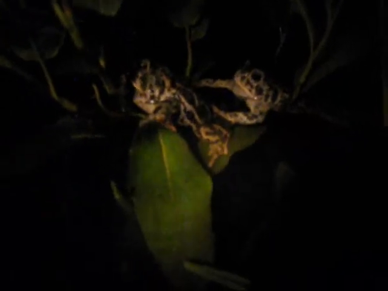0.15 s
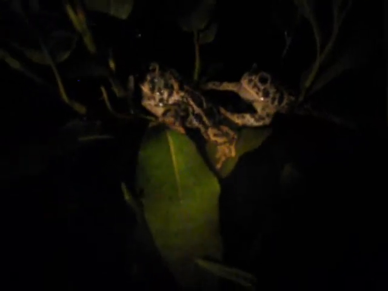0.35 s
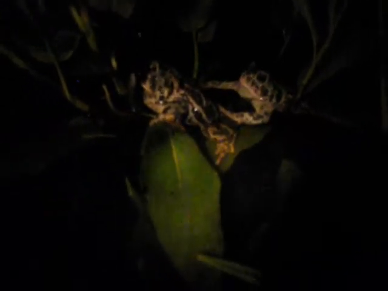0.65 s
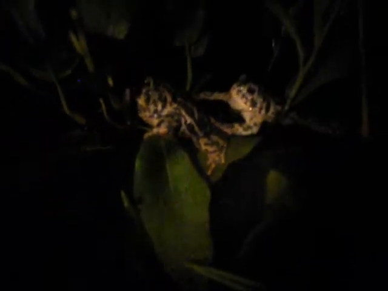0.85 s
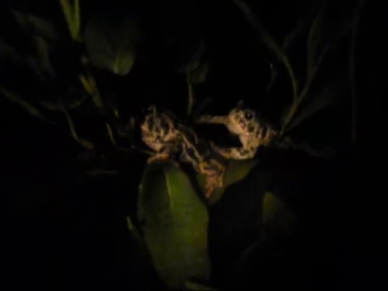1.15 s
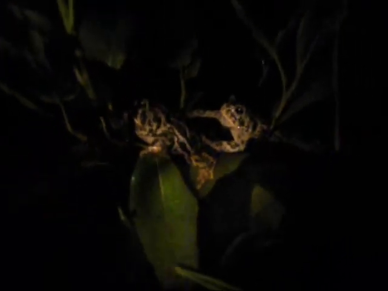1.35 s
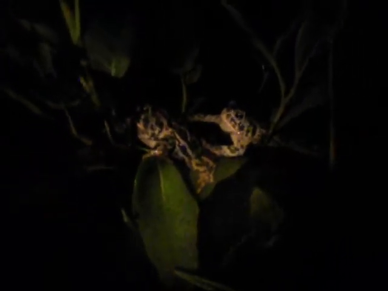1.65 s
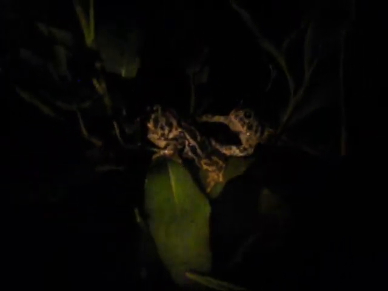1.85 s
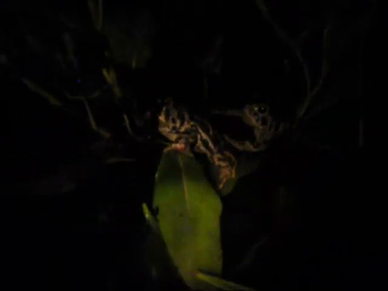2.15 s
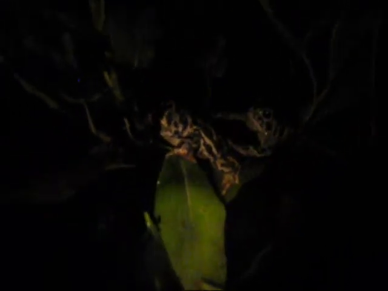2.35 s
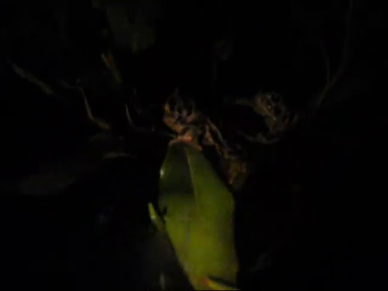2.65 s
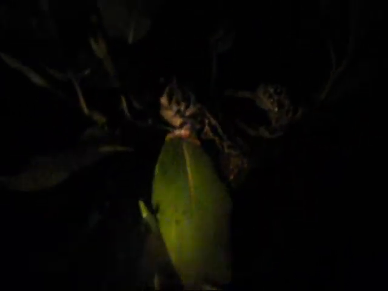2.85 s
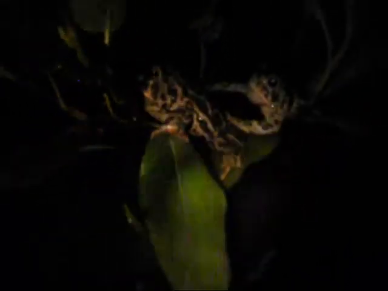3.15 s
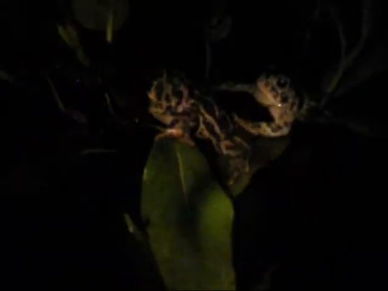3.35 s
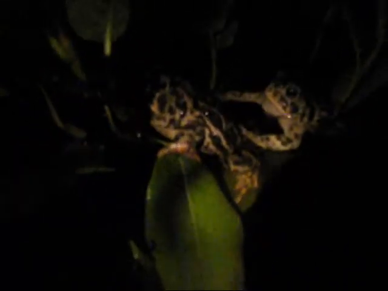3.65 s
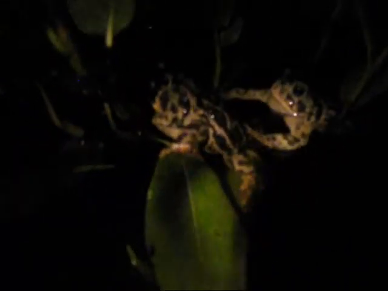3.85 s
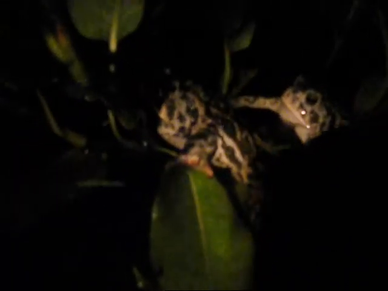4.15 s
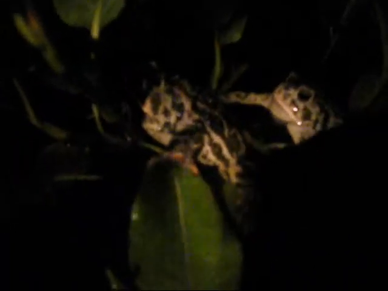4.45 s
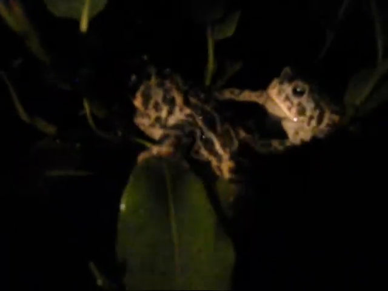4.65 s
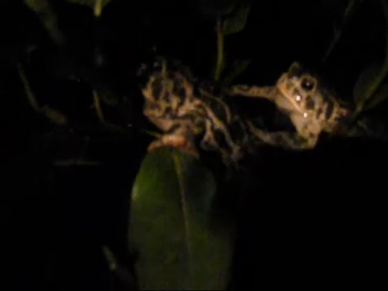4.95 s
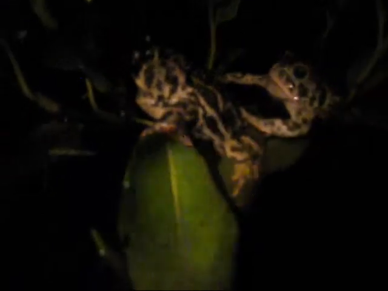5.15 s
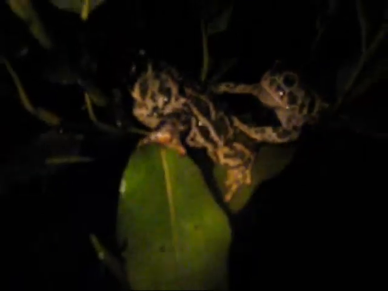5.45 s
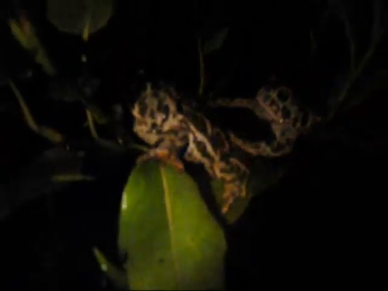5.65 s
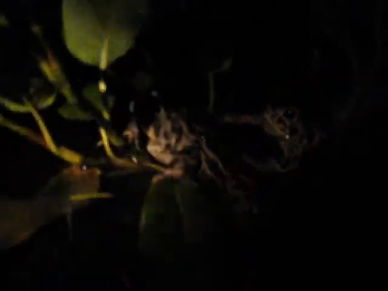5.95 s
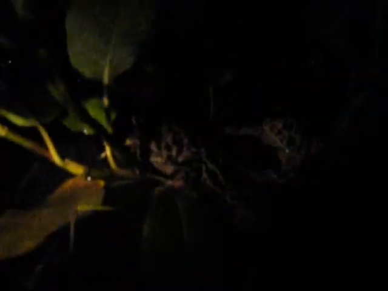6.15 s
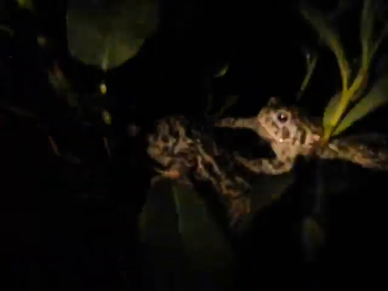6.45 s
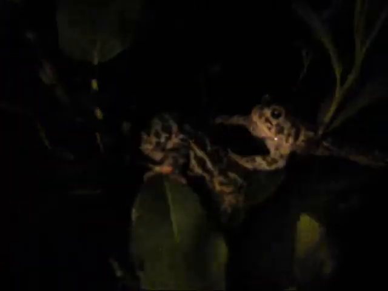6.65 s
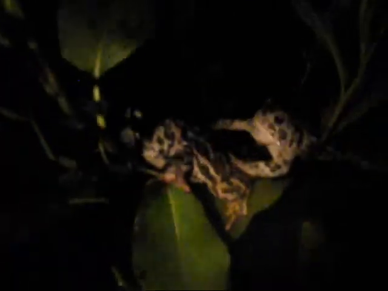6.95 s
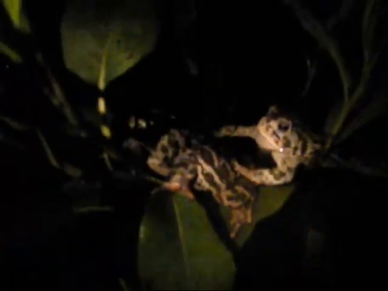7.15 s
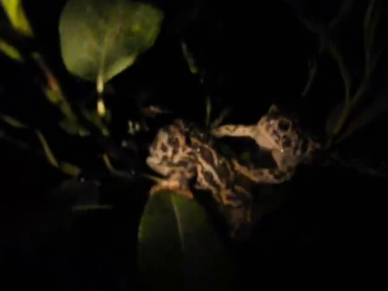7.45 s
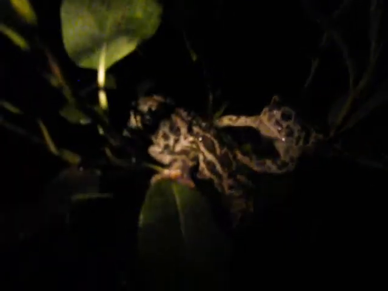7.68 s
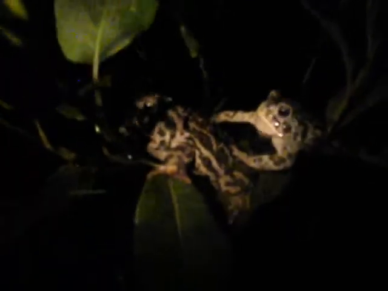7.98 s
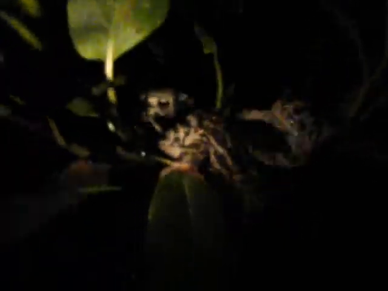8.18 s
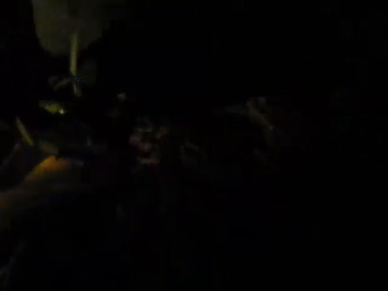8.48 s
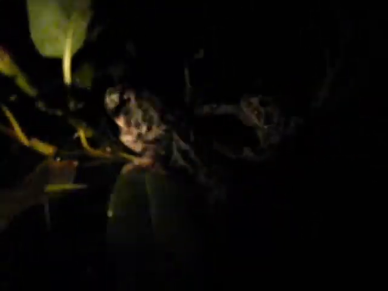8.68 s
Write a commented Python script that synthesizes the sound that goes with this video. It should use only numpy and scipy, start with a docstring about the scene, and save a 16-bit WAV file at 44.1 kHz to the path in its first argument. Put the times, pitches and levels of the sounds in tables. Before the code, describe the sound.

A loud toad chorus is already going at 0 s and never stops: three close males repeat short pulsed notes around 16 to 18 times a second, near 2.3 to 2.5 kHz, blending into a shrill, fluttering buzz over many distant callers. Faint drips plink at 0.3 to 0.5 s and 1.35 s. At about 1.5 s a fourth male enters with a quick rising run, a little slower and lower, and stays prominent. Small frogs tick in short accelerating-free, loosening combs throughout. Rough snores rise faintly at 1.1, 2.6, 5.3, 7.5 and 8.3 s; low grunts come near 1.6, 2.1, 5.2 and 5.8 s. Deep nasal calls murmur behind, the higher one clearer after 6.4 s. Wind thumps the microphone at 0.9 to 1.9 s, hardest near 2.6 s, again at 3.8 s, and lightly after 6.9 s. Sound is gritty, hissy and metallic, ending mid-chorus at 8.8 s.

```python
"""Toads trilling by a flooded field at night

Four near males each repeat a short note of a few throat pulses, tone bursts weighted by the vocal sac, over a far
chorus. Pulsed resonances make a snoring toad, two deep toads and low grunts; small frogs tick and drips fall.
Light wind, as low filtered noise and hard buffets, strikes the microphone. A small camera keeps 8-bit samples
at a low rate and holds each one, which mirrors the trill in the treble."""
import sys
import numpy as np
from scipy import signal
from scipy.io import wavfile
from scipy.ndimage import map_coordinates

SR = 44100
rng = np.random.default_rng(int(sys.argv[2]) if len(sys.argv) > 2 else 0)


def digitize_waveform(pressure):
    """Quantize a signal to 16-bit integers and store it at the path in sys.argv[1].

    Rows of a 2-D input are taken as channels; values are limited to [-1, 1].
    """
    field = np.atleast_2d(pressure).T
    bounded = np.clip(field, -1, 1)
    quanta = np.round(bounded * 32767).astype(np.int16)
    wavfile.write(sys.argv[1], SR, quanta)


N = 388962  # samples


def undb(db):
    """Decibel law: 20 dB is a factor of ten in amplitude."""
    return 10 ** (np.asarray(db) / 20)


def level(x, db):
    """Root-mean-square level: scale a signal to db."""
    return x * undb(db) / np.sqrt(np.mean(x ** 2))


def curve(table, column):
    """Linear interpolation: one column of a table at every sample."""
    rows = np.array(table)
    return np.interp(np.arange(N) / SR, rows[:, 0], rows[:, column])


def band(x, lo_hz, hi_hz):
    """Resonant selection: keep the band between two frequencies."""
    return signal.sosfilt(signal.butter(2, [lo_hz, hi_hz], "bandpass", fs=SR, output="sos"), x)


def bursts(s, hz, db, ms, turns=None):
    """Damped oscillation: tones whose rounded envelopes peak at s, with decay constant ms and turns as phase there."""
    s, hz, db = np.broadcast_arrays(s, hz, db)
    tau = ms * SR / 1000
    k = np.arange(int(16 * tau))
    # the envelope reaches 1 after four decay constants
    shape = (k / (4 * tau)) ** 4 * np.exp(4 - k / tau)
    at = (s * SR - 4 * tau).astype(int)[:, None] + k
    turns = rng.random(len(s)) if turns is None else turns
    turn = turns[:, None] + hz[:, None] * (at / SR - s[:, None])
    wave = undb(db)[:, None] * shape * np.sin(2 * np.pi * turn)
    inside = (at >= 0) & (at < N)
    return np.bincount(at[inside], wave[inside], N)


def run_of_pulses(start, end, rate, first_hz, last_hz, db, ms):
    """Pulse train with a glide: even bursts whose pitch climbs through the call."""
    s = np.arange(start, end, 1 / rate)
    return bursts(s, np.interp(s, [start, end], [first_hz, last_hz]), db, ms)


PULSE_SCATTER_DB, PULSE_JITTER_MS = 2, 0.25
PITCH_SCATTER = 0.012  # fraction of the pitch, drawn once a note


def trill(starts, db, note, pitch, ms):
    """Phase continuity: one tone runs on through the pulses of each note, drawn out when the beat is slow."""
    lag_ms, hz, rel_db = np.transpose(note)
    period = np.gradient(starts)
    chance = rng.standard_normal((len(starts), len(note), 3))
    stretched_ms = np.outer(period / np.median(period), lag_ms)
    s = starts[:, None] + (stretched_ms + PULSE_JITTER_MS * chance[..., 0]) / 1000
    f = pitch * hz * (1 + PITCH_SCATTER * chance[:, :1, 1])
    # phase advances at the mean pitch of neighbouring pulses
    mean_hz = (f + np.roll(f, 1, axis=1)) / 2
    turns = chance[:, :1, 0] + np.cumsum(np.diff(s, prepend=s[:, :1]) * mean_hz, axis=1)
    size_db = db[:, None] + rel_db + PULSE_SCATTER_DB * chance[..., 2]
    return bursts(s.ravel(), f.ravel(), size_db.ravel(), ms, turns.ravel())


# Loudness of each near male. Each row: time in seconds, note level in dB before pulse and sac weighting.
HIGH_LEVEL = [(0, -13), (0.7, -11.5), (1.3, -10), (2.7, -15), (4.7, -12.5), (6.0, -16.5), (7.4, -14.5),
              (8.0, -17.5), (8.8, -14)]
JOINING_LEVEL = [(1.5, -14.5), (2.3, -10.5), (3.001, -10.5), (4.2, -10.5), (6.2, -10.5), (6.801, -9.5),
                 (7.6, -11.5), (8.8, -9)]
QUICK_LEVEL = [(0, -14), (0.7, -20.5), (1.3, -11), (2.001, -16), (2.7, -11.5), (3.4, -14.5), (5.601, -26),
               (7.0, -28), (8.8, -25.5)]
SLOW_LEVEL = [(0, -10.5), (0.7, -16.5), (1.5, -12.5), (2.2, -17), (4.4, -21), (5.1, -13), (5.8, -18.5),
              (7.3, -17.5), (8.8, -16)]
# One note, pulse by pulse; the pitch sags as the sac empties.
# Each row: lag from the note centre in ms at the median beat, pitch in Hz before the singer's pitch factor,
# relative level in dB.
HIGH_NOTE = [(-15.5, 2700, -13.5), (-8, 2500, 0.5), (-2.5, 2520, 2), (4, 2450, 1.5), (9.5, 2350, -3.5),
             (13.5, 2280, -9), (20, 2250, -13.5)]
JOINING_NOTE = [(-18, 2200, -15), (-9, 2250, 0.5), (-2.5, 2330, 3), (4.5, 2230, 0), (10.5, 2080, -9),
                (19.5, 1980, -15)]
QUICK_NOTE = [(-15.5, 2350, -10), (-9, 2400, -3), (-3, 2420, 1.5), (1.5, 2430, 0.5), (7.5, 2330, -2),
              (14, 2280, -6)]
SLOW_NOTE = [(-12.5, 2600, -3), (-6, 2380, 3), (2, 2330, 1), (8, 2250, -2.5), (14.5, 2200, -8)]
# Tempo of each near male from his first note on. Each row: time in seconds, notes per second.
HIGH_TEMPO = [(-.018, 17.816), (1.355, 18.188), (2.01, 17.903), (6.751, 17.773), (7.466, 17.996),
              (8.8, 17.83)]
JOINING_TEMPO = [(1.513, 13.57), (2.129, 13.082), (3.231, 15.751), (5.653, 15.55), (5.842, 16.147),
                 (7.725, 15.902), (7.933, 16.385), (8.8, 15.848)]
QUICK_TEMPO = [(-.029, 17.68), (1.749, 17.373), (2.378, 16.605), (3.303, 17.244), (5.089, 16.498),
               (6.977, 17.284), (8.8, 17.025)]
SLOW_TEMPO = [(-.004, 16.547), (1.87, 16.257), (1.943, 16.515), (6.331, 16.392), (8.8, 16.053)]
# The joining male pumps up his sac with one rising run.
# The row: start in seconds, end in seconds, pulses per second, first pitch in Hz, last pitch in Hz,
# level in dB before the sac.
SAC_PUMP = (1.525, 1.59, 139.5, 1780, 2150, -23)
PULSE_MS = 0.45  # decay constant


def near_males():
    """Phase accumulation: each male starts a note whenever his tempo has added up to one more beat."""
    males = (
        (HIGH_TEMPO, HIGH_LEVEL, HIGH_NOTE),
        (JOINING_TEMPO, JOINING_LEVEL, JOINING_NOTE),
        (QUICK_TEMPO, QUICK_LEVEL, QUICK_NOTE),
        (SLOW_TEMPO, SLOW_LEVEL, SLOW_NOTE),
    )
    out = run_of_pulses(*SAC_PUMP, PULSE_MS)
    for tempo, loudness, note in males:
        t = tempo[0][0] + np.arange(N + SR) / SR
        beats = np.cumsum(np.interp(t, *np.transpose(tempo))) / SR
        starts = np.interp(np.arange(int(beats[-1])), beats, t)
        db = np.interp(starts, *np.transpose(loudness))
        out = out + trill(starts, db, note, pitch=0.99, ms=PULSE_MS)
    return out


FAR_DB, FAR_PULSE_MS = -33.5, 0.55  # level before the sac; decay constant
FAR_PITCH_SPREAD = 0.07  # largest fractional shift either way


def far_males(count=10):
    """Incoherent superposition: many males across the field, each with his own beat, size and distance."""
    out = 0
    for beat, size, near, first in rng.random((count, 4)):
        starts = np.arange(-first, 170) / (14.5 + 4.5 * beat)  # notes per second
        pitch = 1 + FAR_PITCH_SPREAD * (2 * size - 1)
        out = out + trill(starts, np.full(len(starts), 6 * near), QUICK_NOTE, pitch, FAR_PULSE_MS)
    return level(out, FAR_DB)


SAC_HZ, SAC_DB = 2150, 3  # corner frequency; gain above it


def sac(x):
    """Radiation efficiency: the vocal sac radiates poorly below its corner, thinning each pulse's low flank."""
    return undb(SAC_DB) * signal.sosfilt(signal.butter(2, SAC_HZ, "highpass", fs=SR, output="sos"), x)


# Small frogs' combs of ticks. Each row: first tick in seconds, last tick in seconds, number of ticks,
# first gap in ms, level in dB toward which the ticks rise, before scatter.
TICK_COMBS = [(0.299, 0.659, 10, 27, -30.5), (0.888, 1.083, 6, 36, -27.5), (1.646, 1.975, 9, 31, -30),
              (2.205, 2.399, 6, 36, -30), (3.22, 3.551, 9, 36, -31), (3.748, 3.897, 5, 35, -34.5),
              (4.458, 4.779, 9, 33, -31.5), (5.05, 5.212, 5, 43, -35.5), (5.762, 6.047, 8, 34, -37.5),
              (6.35, 6.543, 6, 33, -35), (6.957, 7.193, 7, 31, -36.5), (7.482, 7.673, 6, 38, -35.5),
              (7.95, 8.201, 8, 31, -38.5), (8.693, 8.811, 4, 40, -35.5)]
COMB_HZ, COMB_START_DB, COMB_SCATTER_DB = (3250, 3620), -5.5, 2.5
TICK_MS = 0.7  # decay constant
CLOSING_MS, CLOSING_HZ, CLOSING_DB = 32, 3450, -5.5  # one weak tick ends each comb


def small_frogs():
    """Rhythmic modulation: gaps drift, mostly wider, and level off while pitch and mean strength climb."""
    out = 0
    for first, last, ticks, gap_ms, db in TICK_COMBS:
        along = np.linspace(0, 1, round(ticks))
        widen = np.sin(np.linspace(0, 0.6 * np.pi, len(along) - 1)) ** 2
        # share the time left over by even gaps so that the comb ends on its last tick
        spare = last - first - len(widen) * gap_ms / 1000
        gaps = gap_ms / 1000 + widen * spare / widen.sum()
        rise = np.sin(0.47 * np.pi * along)
        size_db = db + COMB_START_DB * (1 - rise) + COMB_SCATTER_DB * rng.standard_normal(len(along))
        s = first + np.r_[0, np.cumsum(gaps)]
        out = out + bursts(s, np.interp(rise, [0, 1], COMB_HZ), size_db, TICK_MS)
        out = out + bursts([last + CLOSING_MS / 1000], CLOSING_HZ, db + CLOSING_DB, TICK_MS)
    return out


# Snoring calls. Each row: start in seconds, end in seconds, pulses per second, first pitch in Hz,
# last pitch in Hz, pulse level in dB.
SNORE_CALLS = [(1.101, 1.574, 58, 1120, 1210, -45.5), (2.599, 3.215, 54, 1224, 1268, -42.5),
               (5.255, 5.75, 56, 1180, 1250, -52), (7.498, 8.082, 51, 1138, 1217, -50.5),
               (8.253, 8.804, 61, 1205, 1307, -45.5)]


def snoring_toad():
    """Pulsed resonance: bursts too quick to count merge into a rough, rising snore."""
    return sum(run_of_pulses(*call, ms=0.9) for call in SNORE_CALLS)


# Two deeper-voiced toads far off. Each row: time in seconds, lower toad's level in dB, upper toad's level in dB.
DEEP_LEVELS = [(0.0, -48.5, -51.5), (0.44, -50, -49), (0.68, -51, -54.5), (1.87, -51.5, -48),
               (3.91, -45, -49.5), (4.54, -47, -48), (4.84, -45, -45), (6.04, -47, -45), (6.41, -46, -41),
               (7.2, -53.5, -41), (8.47, -54.5, -40), (8.82, -53.5, -40.5)]
DEEP_HZ, DEEP_RATES = (1692, 1810), (55, 51.5)  # resonances; pulses per second


def deep_toads():
    """Impulse excitation: each toad strikes his resonance afresh at a nearly even pace, a long nasal call."""
    out = 0
    for toad, (hz, rate) in enumerate(zip(DEEP_HZ, DEEP_RATES)):
        chance = rng.standard_normal((600, 2))
        s = np.cumsum(1 + 0.012 * chance[:, 0]) / rate
        heard = s < N / SR
        pulses = np.bincount((s[heard] * SR).astype(int), undb(2.2 * chance[heard, 1]), N)
        calls = band(band(pulses, hz - 90, hz + 90), hz - 90, hz + 90)
        out = out + level(calls, 0) * undb(curve(DEEP_LEVELS, 1 + toad))
    return out


# Low grunts close by. Each row: start in seconds, end in seconds, pulses per second,
# level of the low resonance in dB before its swell and scatter, upper resonance in Hz,
# upper level relative to the low one in dB.
GRUNT_CALLS = [(1.606, 1.682, 100, -44.5, 700, 2), (2.083, 2.173, 83, -42.5, 705, 4),
               (5.201, 5.269, 85, -50.5, 480, 5.5), (5.798, 5.871, 68, -50.5, 590, 4)]


def grunts():
    """Coupled excitation: a few slow, uneven pulses ring a low resonance and a broader upper one."""
    out = 0
    for start, end, rate, db, upper_hz, upper_db in GRUNT_CALLS:
        s = np.arange(start, end, 1 / rate)
        swell_db = 4 * np.log10(np.hanning(len(s) + 2)[1:-1])
        size_db = db + swell_db + 2.2 * rng.standard_normal(len(s))
        out = out + bursts(s, 200, size_db, ms=1.9)
        out = out + bursts(s, upper_hz, size_db + upper_db, ms=0.44)
    return out


# Drips into the water. Each row: time in seconds, peak level in dB, pitch in Hz.
WATER_DRIPS = [(0.3, -41.5, 258), (0.388, -41.5, 384), (0.474, -38.5, 315), (1.353, -36.5, 847)]


def drips():
    """Damped resonance: each drip into the water is one short low tone."""
    s, db, hz = np.transpose(WATER_DRIPS)
    return bursts(s, hz, db, ms=0.92)


FAR_FROGS_DB, FAR_FROGS_HZ = -50, (2905, 4083)


def far_frogs(count=2500):
    """Random superposition: ticks of many distant small frogs merge into a haze, thinner toward the top."""
    when, high, size = rng.random((count, 3)).T
    lo_hz, hi_hz = FAR_FROGS_HZ
    ticks = bursts(when * N / SR, lo_hz + (hi_hz - lo_hz) * high, 6 * size - 9 * high, ms=0.6)
    return level(ticks, FAR_FROGS_DB)


FIELD_DB, FIELD_T60_S = -13, 0.08  # tail energy against the direct sound; time to fall 60 dB


def field(x):
    """Diffuse scattering: plants and water trail every call with a short decaying tail."""
    t = np.arange(int(0.4 * SR)) / SR
    tail = rng.standard_normal(len(t)) * 10 ** (-3 * t / FIELD_T60_S)
    return x + undb(FIELD_DB) * signal.fftconvolve(x, tail / np.linalg.norm(tail))[:N]


# Strength of the breeze at the microphone. Each row: time in seconds, level in dB.
BREEZE = [(0, -57.5), (0.39, -60.5), (0.83, -60.5), (1.1, -47), (2.0, -49.5), (2.25, -59), (2.48, -55),
          (2.65, -51.5), (3.3, -53), (3.5, -62.5), (3.8, -53), (4.0, -62), (5.8, -63.5), (6.9, -54.5),
          (7.84, -62), (8.25, -50.5), (8.55, -57), (8.82, -55.5)]
# Single hard buffets. Each row: time in seconds, peak level in dB.
BUFFETS = [(0.024, -40.5), (0.885, -34), (1.008, -34), (1.096, -37), (1.248, -27.5), (1.333, -38.5),
           (1.474, -42), (1.554, -36), (1.59, -36), (1.711, -36), (1.905, -31.5), (2.551, -35),
           (2.628, -24), (2.702, -25.5), (2.786, -44.5), (3.012, -47), (3.223, -39.5), (3.735, -33),
           (3.773, -33), (3.835, -32.5), (6.857, -39.5), (7.14, -39.5), (7.486, -35.5), (8.3, -37),
           (8.644, -37.5)]
BUFFET_HZ, BUFFET_MS = 109, 0.94  # pitch; decay constant


def wind():
    """Turbulence: eddies thump the microphone port, dull puffs of uneven size over a rumble, and hard buffets."""
    struck = rng.random(N) < 60 / SR  # about 60 puffs a second
    puffs = struck * rng.standard_normal(N) * undb(3 * rng.exponential(size=N))
    air = level(puffs, 1.5) + rng.standard_normal(N)
    breeze = level(band(air, 22, 105), 0) * undb(curve(BREEZE, 1))
    s, db = np.transpose(BUFFETS)
    return breeze + bursts(s, BUFFET_HZ, db, BUFFET_MS)


def hiss():
    """White noise: equal power at every frequency, a steady hiss."""
    return level(rng.standard_normal(N), -51)


def scene():
    """Linear superposition: calls cross the field, while near sounds, wind and hiss arrive without its tail."""
    trills = sac(near_males() + far_males())
    calls = trills + small_frogs() + snoring_toad() + deep_toads() + far_frogs()
    close = grunts() + drips() + wind()
    return (field(calls) + close + hiss())[None]


OVERLOAD = 0.32  # level at which the preamplifier runs out of swing
CAMERA_RATE, STEPS = 11024, 128  # samples per second; steps per unit of amplitude
SLIP = 419  # offset of the sampling grid, in output samples
TOP_HZ = 15700  # upper band limit


def record(dry):
    """Saturation and aliasing images: flatten peaks, band-limit, round down to 8 bits and hold each sample."""
    squeezed = dry[0] / (1 + (dry[0] / OVERLOAD) ** 4) ** 0.25
    smooth = signal.sosfilt(signal.butter(8, 5300, fs=SR, output="sos"), squeezed)
    # the rates do not divide evenly, so a few holds a second last one step longer
    slot = (np.arange(N) + SLIP) * CAMERA_RATE // SR
    held = map_coordinates(smooth, [slot * SR / CAMERA_RATE - SLIP], order=3, mode="nearest")
    stepped = np.floor(held * STEPS) / STEPS
    return signal.sosfilt(signal.ellip(10, 0.2, 90, TOP_HZ, fs=SR, output="sos"), stepped)[None]


dry = scene()
out = record(dry)
digitize_waveform(out)
```